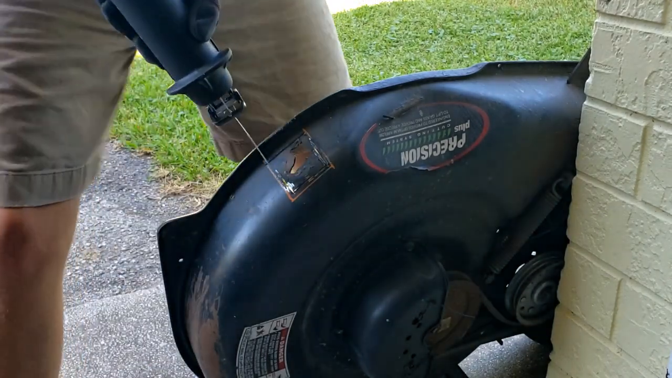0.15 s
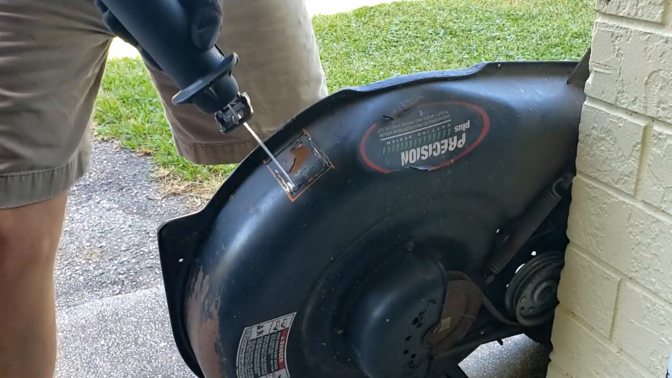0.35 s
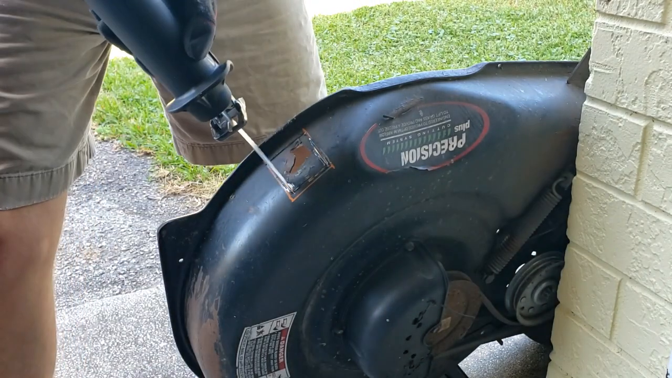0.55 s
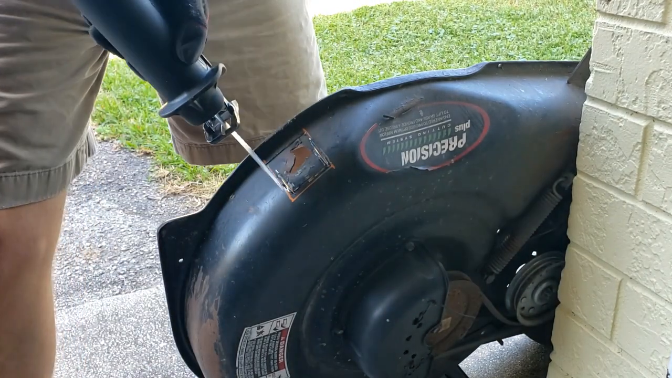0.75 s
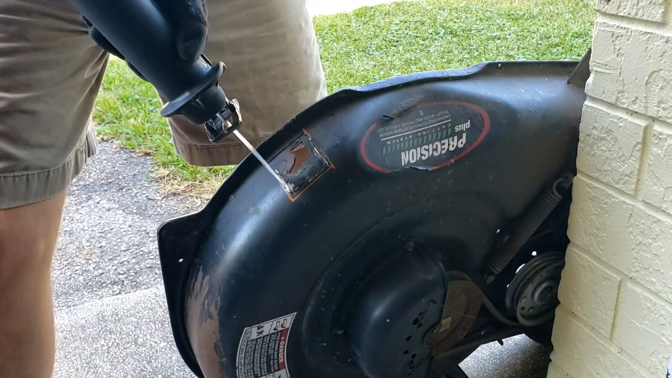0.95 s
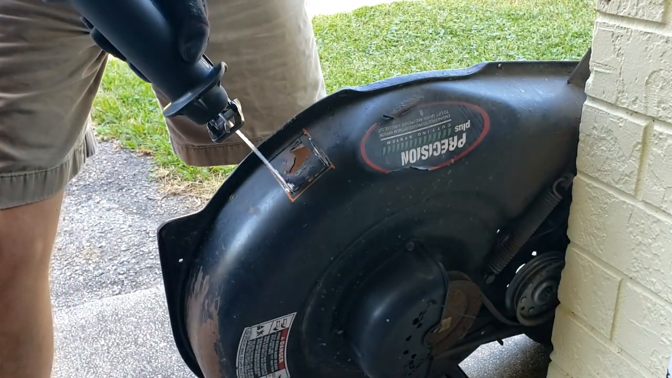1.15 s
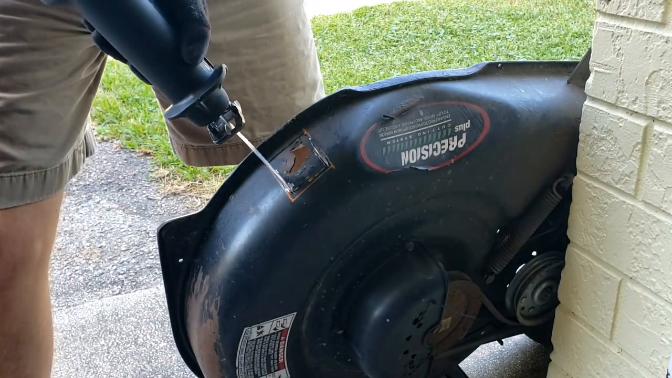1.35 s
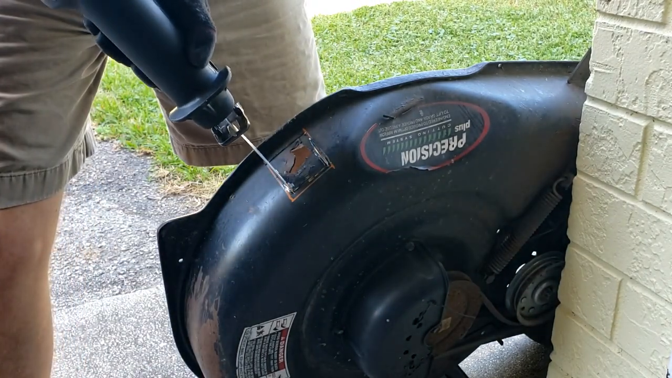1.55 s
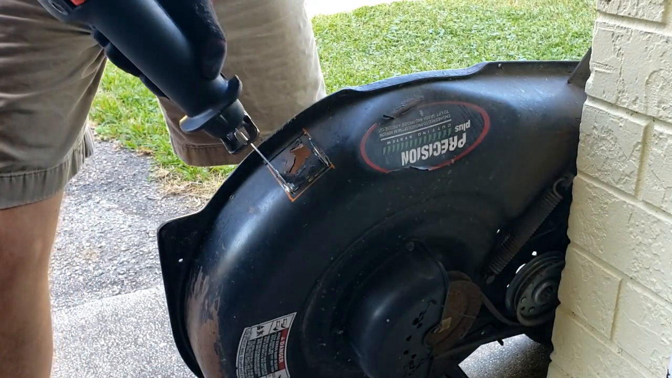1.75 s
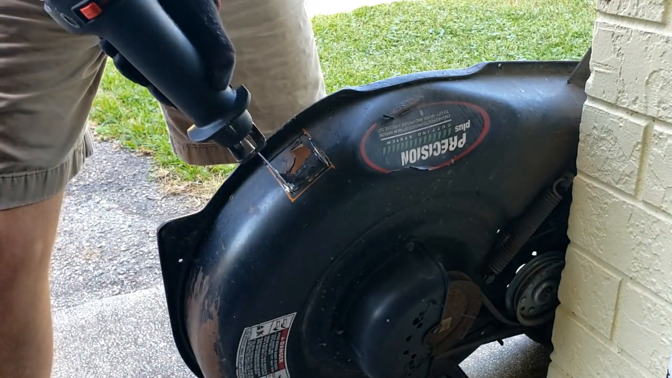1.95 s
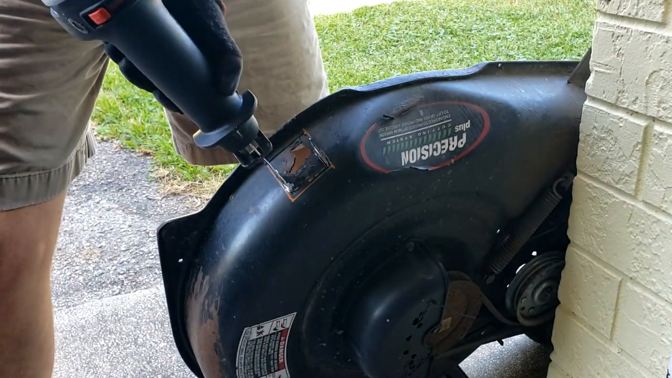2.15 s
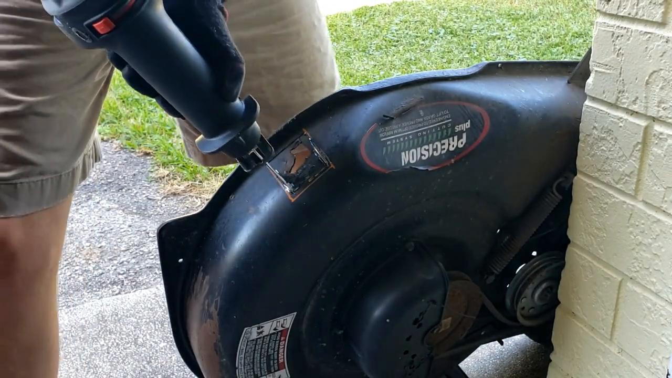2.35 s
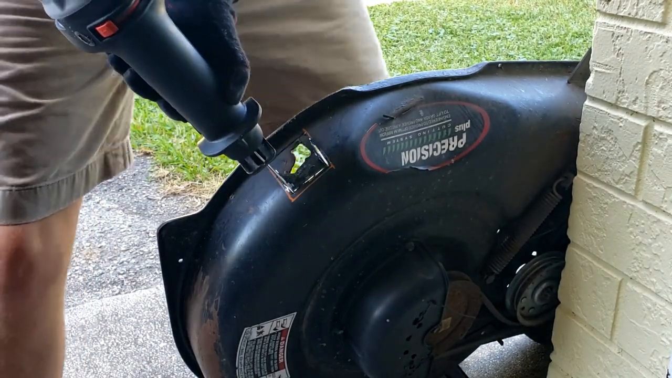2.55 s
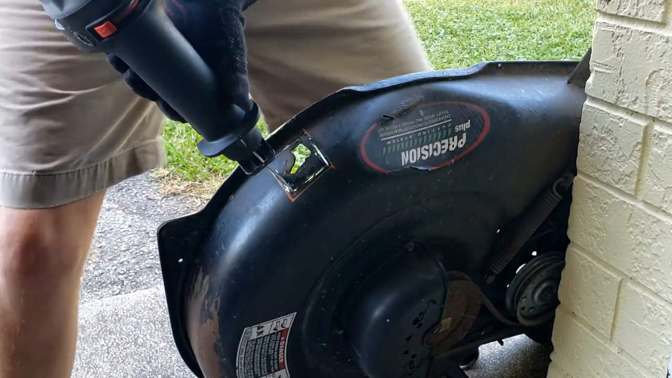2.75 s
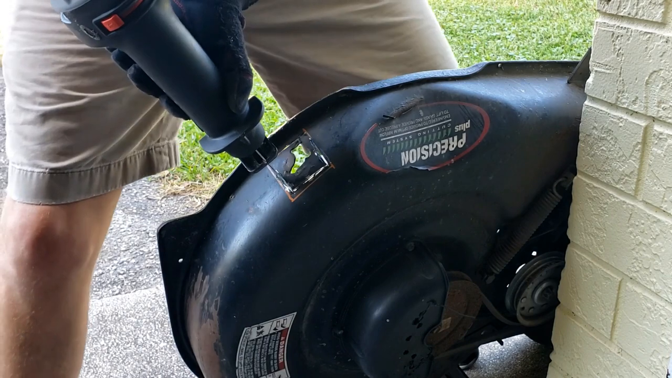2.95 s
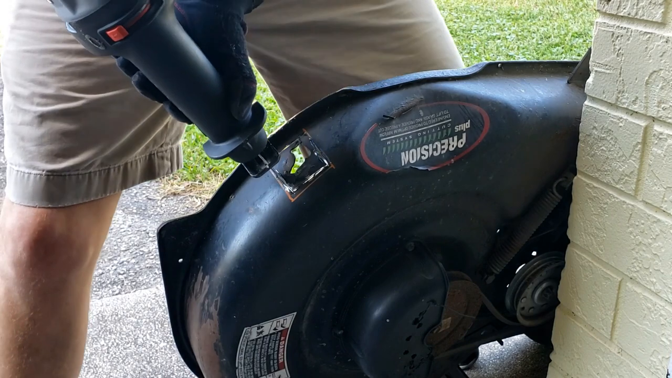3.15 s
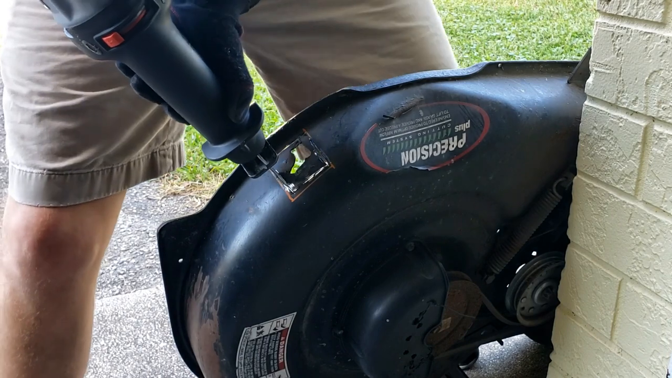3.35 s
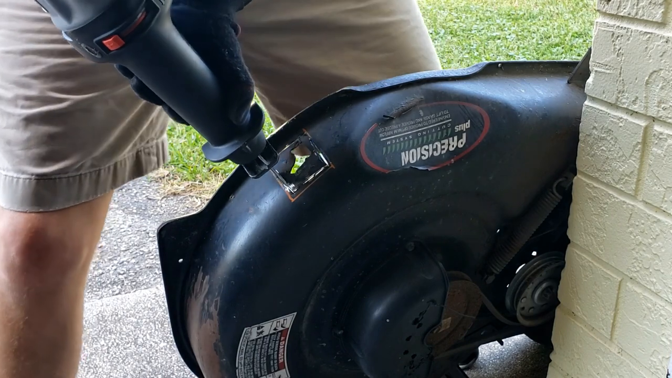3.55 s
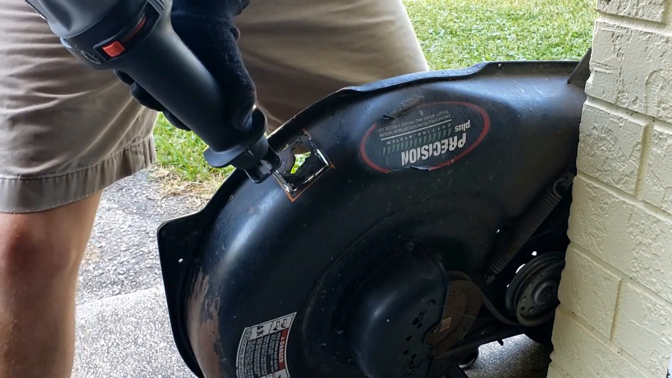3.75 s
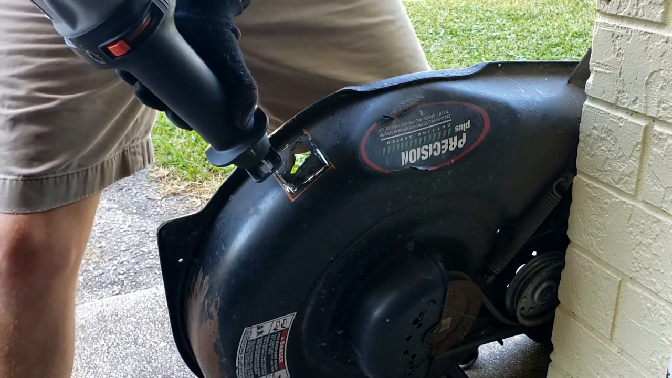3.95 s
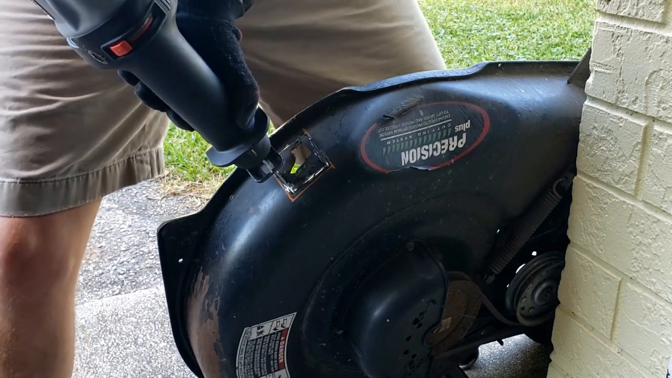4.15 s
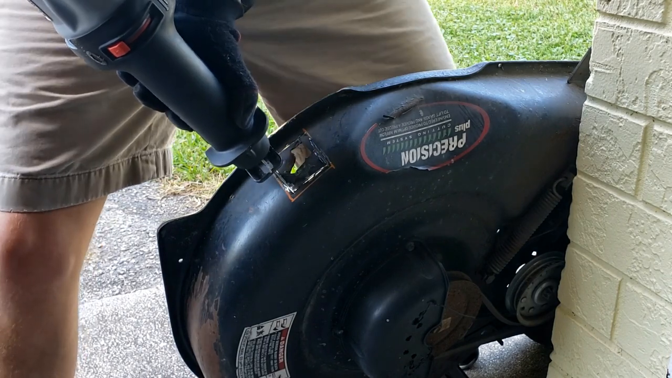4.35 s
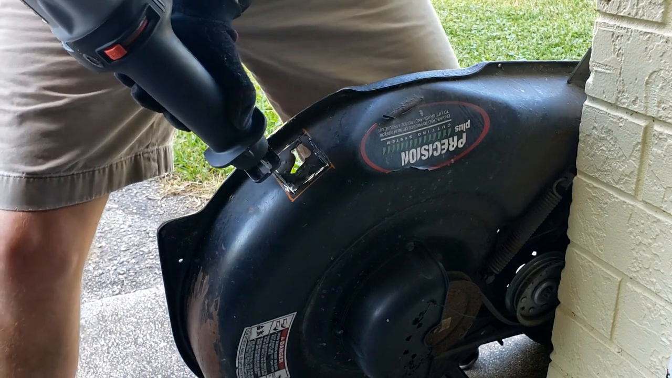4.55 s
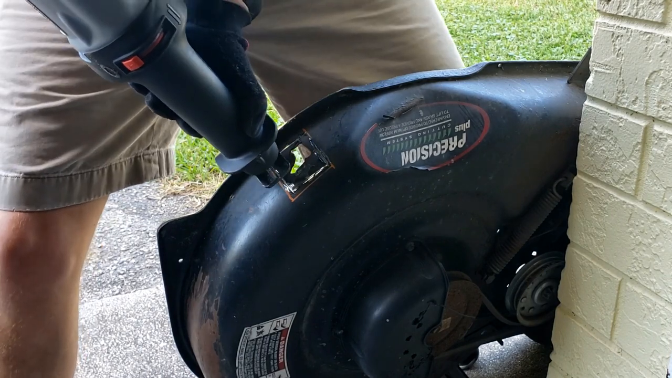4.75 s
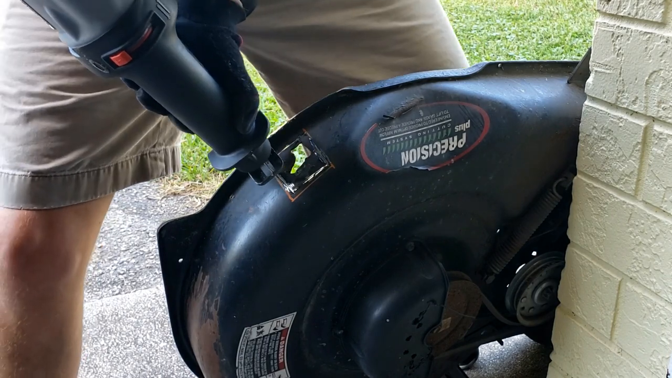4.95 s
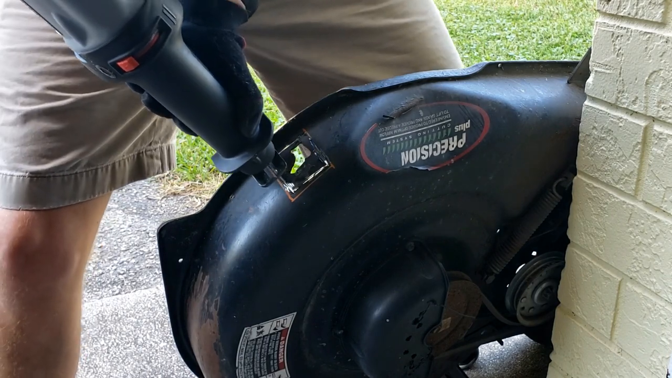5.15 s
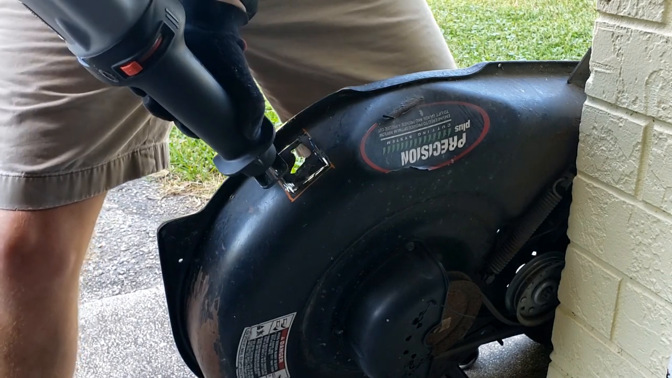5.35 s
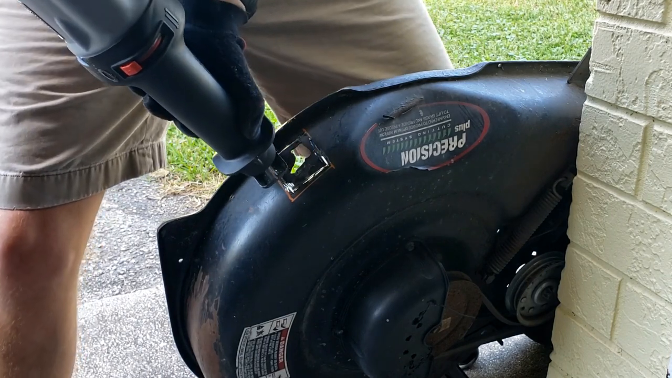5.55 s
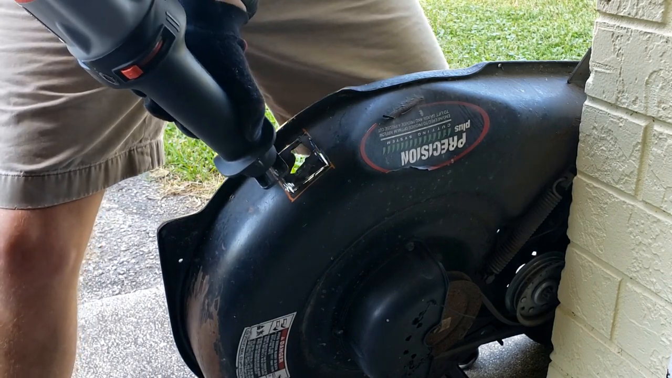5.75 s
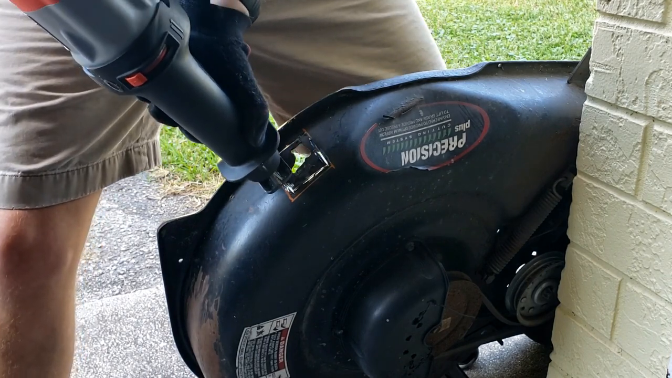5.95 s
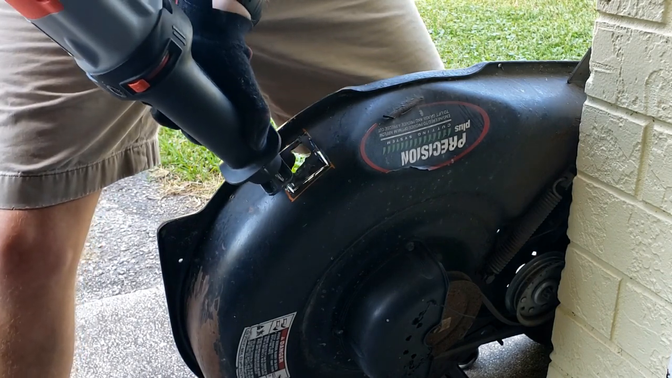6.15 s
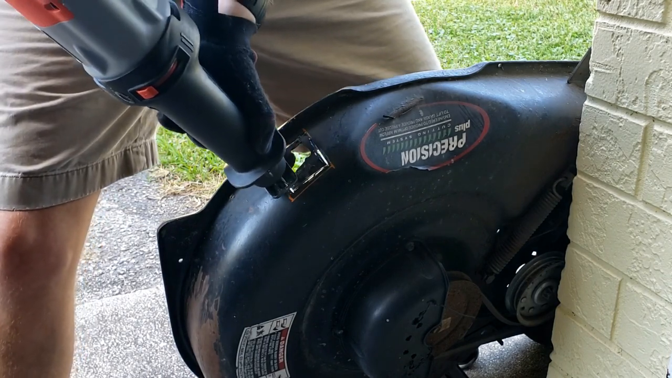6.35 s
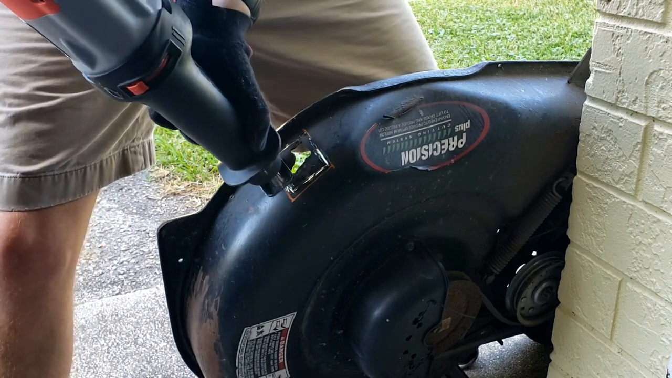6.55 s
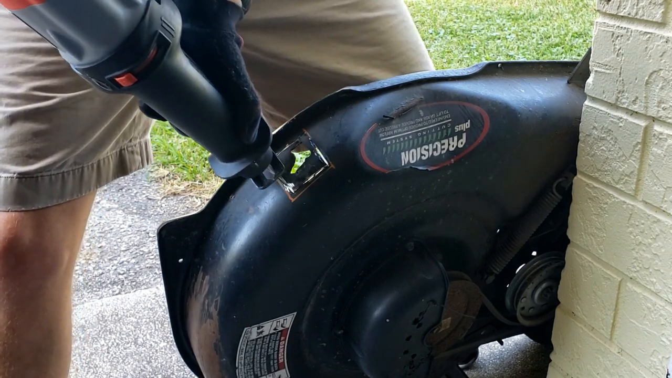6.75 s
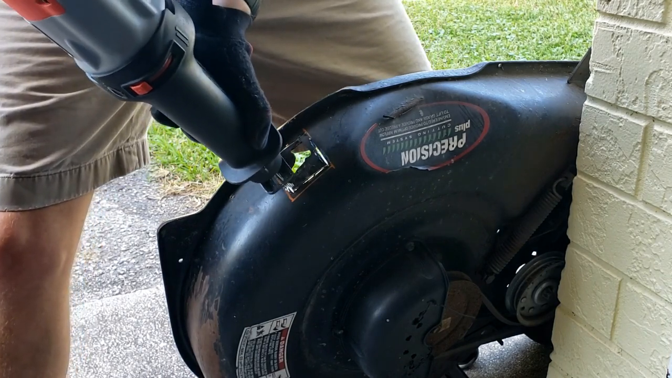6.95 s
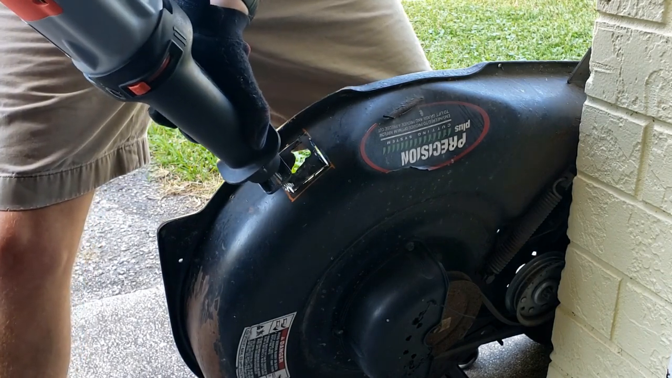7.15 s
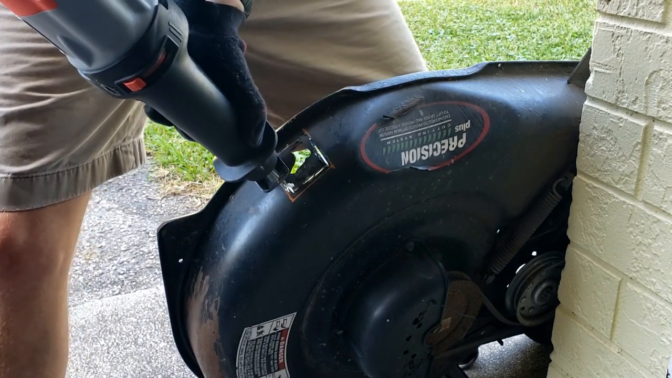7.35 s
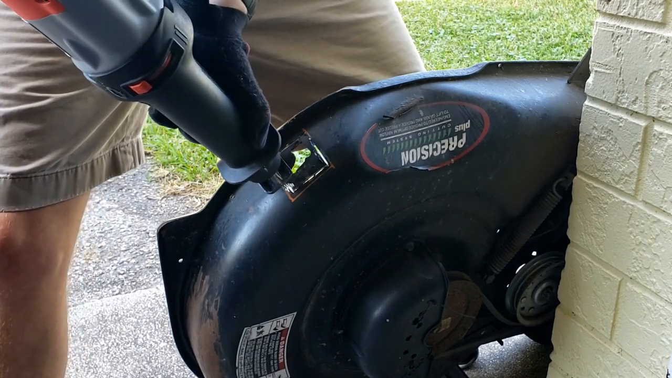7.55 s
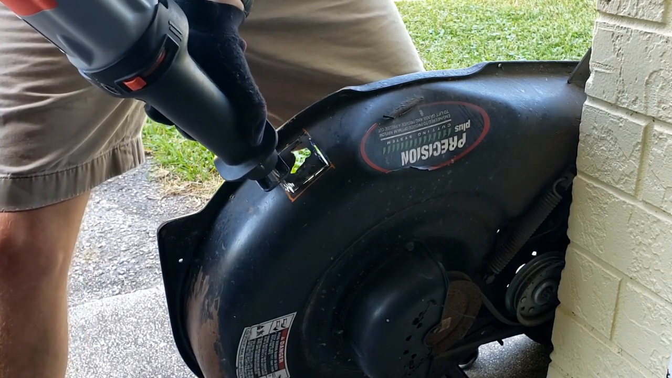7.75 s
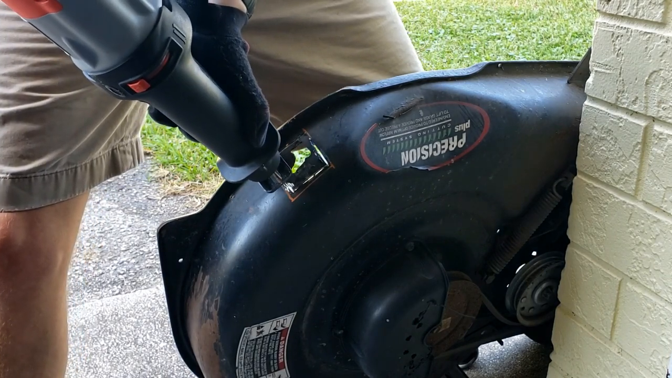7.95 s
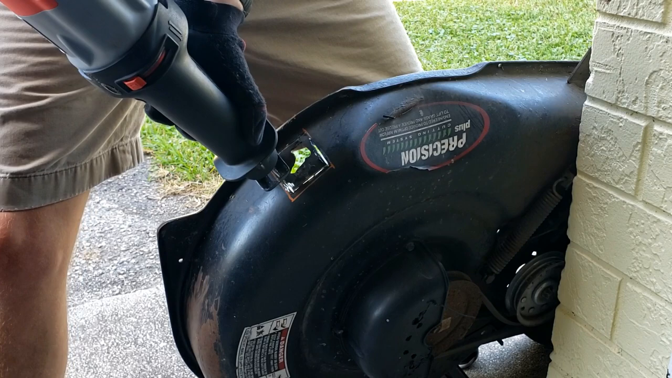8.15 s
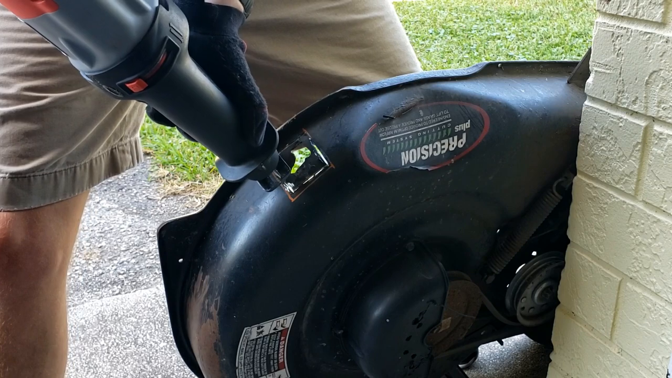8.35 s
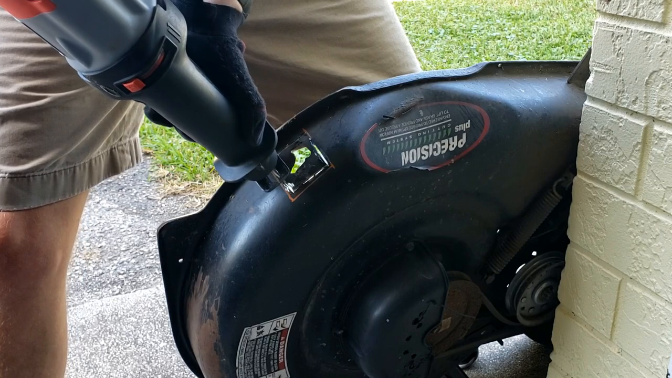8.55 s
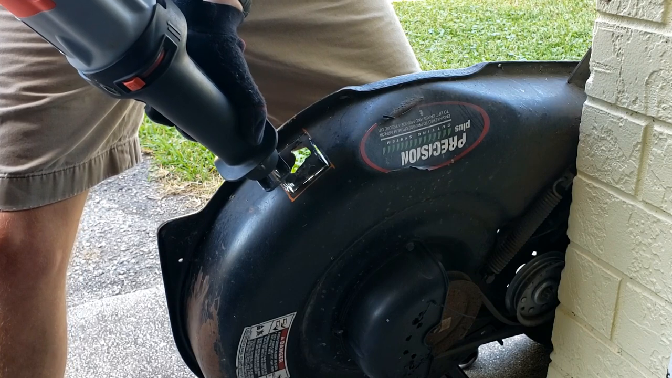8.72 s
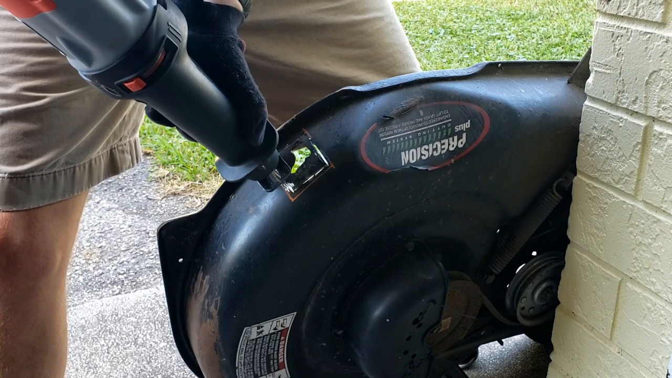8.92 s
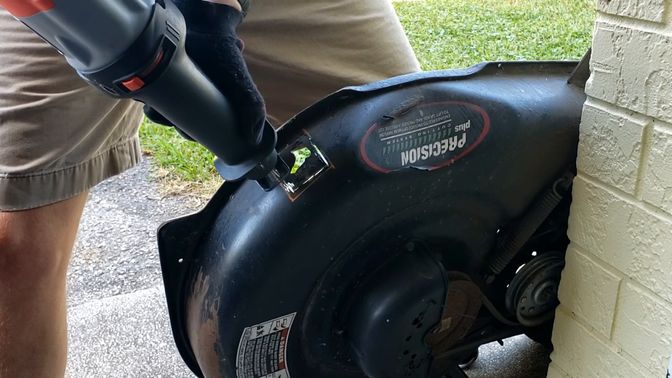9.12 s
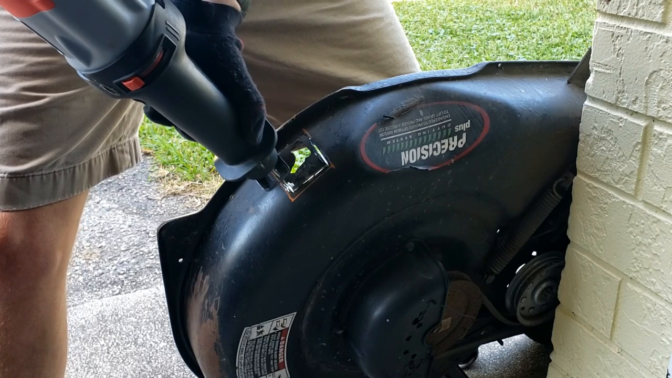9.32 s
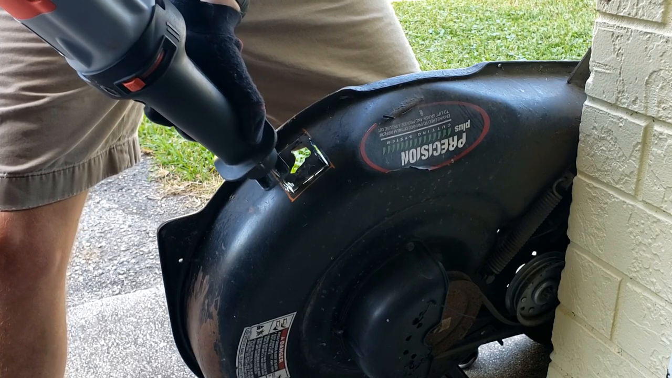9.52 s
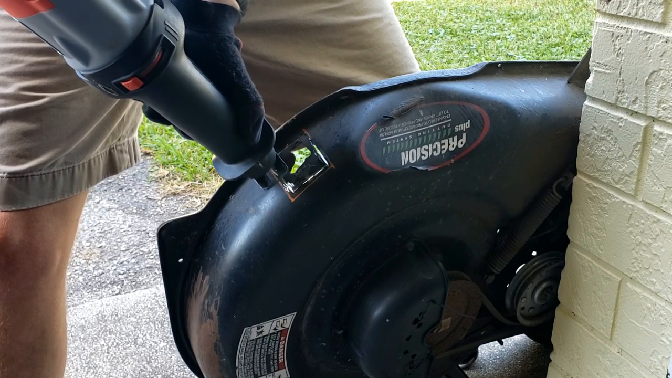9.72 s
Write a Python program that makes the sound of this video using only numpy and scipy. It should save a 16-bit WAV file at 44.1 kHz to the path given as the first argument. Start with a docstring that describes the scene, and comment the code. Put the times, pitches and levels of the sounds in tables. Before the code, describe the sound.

Close by in the open air, a hollow steel deck is nudged and a thin blade scrapes lightly in its opening, with a brief shrill squeak. An electric reciprocating saw then spins up with a rising whine and buzz, jerking the sheet into loud clanging bangs. It breaks off for under a second, restarts, and cuts steadily with fast rattling blows and bright rasp. Faint wind buffets the microphone; no reverberant room.

```python
"""Distant rumble outdoors, two soft bumps of a mower deck set down, then a blade scraping and squeaking
in its slot. The reciprocating saw starts up, rasps, breaks off briefly and bites again; each jerk of the
thin steel sheet rings the deck, ten or more bangs a second. Tooth contacts and blows drive ringing modes
and coloured bands; wandering tones make whine, buzz and panel song; shaped noise makes roar, rumble
and wind on the microphone ports. The steel lies a little to the right."""
import sys
import numpy as np
from scipy import signal
from scipy.fft import rfft, irfft, next_fast_len
from scipy.io import wavfile

SR = 44100
rng = np.random.default_rng(int(sys.argv[2]) if len(sys.argv) > 2 else 0)


def invert_db(x):
    """Field ratio 10**(x/20) for x, a level in decibels (scalar or array-like)."""
    u = np.asarray(x, float) / 20
    return 10 ** u


def inscribe(sig):
    """Save sig as 16-bit PCM at rate SR to the path in sys.argv[1].

    A 1-D sig is mono; a 2-D sig holds one channel per row.
    Samples are clipped to [-1, 1] before scaling.
    """
    pcm = np.round(np.clip(np.atleast_2d(sig).T, -1, 1) * 32767)
    wavfile.write(sys.argv[1], SR, pcm.astype(np.int16))


N = 435708


def rms_one(x):
    """Scale to rms 1."""
    return x / np.sqrt(np.mean(x ** 2) + 1e-20)


def in_time(rows):
    """Columns of a curve table, one value per sample."""
    s, *columns = np.transpose(rows)
    return [np.interp(np.arange(N) / SR, s, c) for c in columns]


def held(rows, rise, fall):
    """Levels in dB of events that rise, hold and fall (slopes in dB per s); the loudest wins."""
    rows = np.array(rows)
    t = np.arange(0, N, 64)[:, None] / SR
    start_s, length_s = rows[:, 0], rows[:, 1]
    before_db = rise * np.maximum(start_s - t, 0)
    after_db = fall * np.maximum(t - start_s - length_s, 0)
    curves = [np.max(db - before_db - after_db, axis=1) for db in rows.T[2:]]
    return [np.interp(np.arange(N) / SR, t[:, 0], curve) for curve in curves]


def swells(times, levels_db, rise_s, fall_s):
    """An envelope that rises smoothly and dies at each time."""
    marks = np.full(N, 1e-18)
    np.add.at(marks, np.round(np.array(times) * SR).astype(int), invert_db(levels_db))
    up, down = np.exp(-1 / (rise_s * SR)), np.exp(-1 / (fall_s * SR))
    return signal.lfilter([(1 - up) ** 2], np.poly([up, up, down]), marks)


def flicker(count):
    """Slow random wavering below about 21 Hz, of spread 1, one row per layer."""
    r = np.exp(-2 * np.pi * 21 / SR)
    white = rng.standard_normal((count, N + SR))
    slow = signal.lfilter([1], [1, -2 * r, r * r], white)[:, SR:]     # drop the filter's first second
    return slow / slow.std(axis=1, keepdims=True)


def at_hz(points, hz):
    """Read a spectrum on a log axis."""
    hz_points, values = np.transpose(points)
    return np.interp(np.log(hz + 1), np.log(hz_points + 1), values)


def colour(x, spectrum):
    """Shape a flat signal by a spectrum; rms 1 for rms 1 white input."""
    size = next_fast_len(N)
    gain = invert_db(at_hz(spectrum, np.arange(size // 2 + 1) * SR / size))
    return irfft(rfft(x, size) * rms_one(gain), size)[..., :N]


def uneven(x, width_hz, depth_db):
    """A random comb of peaks and dips, as from many unnamed modes."""
    size = next_fast_len(N)
    knots = rng.standard_normal(round(SR / width_hz))
    hz = np.arange(size // 2 + 1) * SR / size
    gain = invert_db(depth_db * np.interp(hz, np.arange(len(knots)) * width_hz, knots))
    return irfft(rfft(x, size) * gain, size)[..., :N]


def band(x, low_hz, high_hz):
    """Band-pass."""
    return signal.sosfilt(signal.butter(2, [low_hz, high_hz], "band", fs=SR, output="sos"), x)


def ring(force, hz, t60):
    """One damped mode, dying 60 dB in t60 seconds; a white force of rms 1 gives rms 1."""
    r, w = invert_db(-60 / (max(t60, .004) * SR)), 2 * np.pi * hz / SR
    return signal.lfilter([0, 2 * np.sqrt(1 - r) * np.sin(w)], [1, -2 * r * np.cos(w), r * r], force + 1e-18)


def wavering(hz, width_hz, steady):
    """A tone on a moving pitch, partly steady, partly narrow noise; rms 1."""
    white = rng.standard_normal((2, N))
    wobble = signal.lfilter([1], [1, -np.exp(-np.pi * width_hz / SR)], white)
    height = steady + rms_one(wobble[0]) + 1j * rms_one(wobble[1])
    return rms_one(np.real(height * np.exp(2j * np.pi * np.cumsum(hz) / SR)))


def teeth(per_s, spread_db):
    """Dense tooth contacts of uneven size, two unrelated trains; rms 1."""
    sizes = invert_db(spread_db * np.minimum(rng.exponential(1, (2, N)), 5))
    signed = sizes * rng.choice([-1, 1], (2, N))
    return rms_one(signed * (rng.random((2, N)) < per_s / SR))


def two_ears(pair, hz):
    """Mix two unrelated signals so that left and right are as alike as the table says at hz."""
    # how alike the two microphone channels are: pitch_hz, likeness (0 unrelated to 1 identical)
    likeness = [(40, 0.93), (125, 1), (550, 0.86), (1100, 0.97), (2000, 0.99), (4000, 0.097), (8000, 0.062),
                (15000, 0.22)]
    alike = np.clip(at_hz(likeness, hz), 0, 1)
    return np.sqrt((1 + alike) / 2) * pair[0] + np.sqrt((1 - alike) / 2) * pair[1] * [[1], [-1]]


def outdoors():
    """Far rumble with a faint hiss, and wind on the ports: deep lumps and a higher flutter, as shaped noise."""
    # colour of the distance: pitch_hz, relative level_db (per Hz)
    rumble_colour = [(12, -62), (20, -28), (40, -31.5), (64, -4), (202, -28.5), (220, -30), (633, -41.5),
                     (707, -45), (1020, -49), (6950, -64.5), (15600, -53)]
    # rise and fall of the distance: time_s, relative level_db
    rumble_level = [(0, -52), (4.6, -53.5), (5.0, -46.5), (5.9, -47.5), (6.1, -57), (6.5, -52.5),
                    (7.0, -46), (8.0, -49), (9.1, -43), (9.88, -46)]
    # puffs of wind on the microphone ports: start_s, relative deep_db, relative upper_db
    gusts = [(0.05, -62, -60), (1.2, -41, -56), (2.3, -63, -58), (3.4, -56, -57), (4.7, -58, -41),
             (4.9, -57, -35.5), (5.1, -60, -34), (6.049, -70, -46), (6.821, -47, -51), (6.969, -42, -50),
             (7.052, -53, -59), (7.402, -38, -55), (7.601, -61, -65), (7.82, -59, -44), (8.24, -46, -38),
             (9.12, -35, -58), (9.379, -50, -54), (9.8, -48, -47.5)]
    rise_s, fall_s, calm_db = 0.014, 0.067, -71.5
    rumble_db, = in_time(rumble_level)
    s, deep_db, upper_db = np.transpose(gusts)
    far = colour(rng.standard_normal((2, N)), rumble_colour)
    deep = two_ears(band(far, 15, 80), 40)
    middle = two_ears(band(far, 100, 320), 146.6)
    high = two_ears(band(far, 246, 19000), 8000)
    flutter = rms_one(band(two_ears(rng.standard_normal((2, N)), 150), 78, 324))
    lumps = rms_one(band(rng.standard_normal((2, N)), 22, 75))
    deep_wind = swells(s, deep_db, rise_s, fall_s) * lumps
    upper_wind = (invert_db(calm_db) + swells(s, upper_db, rise_s, fall_s)) * flutter
    return invert_db(rumble_db) * (deep + middle + high) + deep_wind + upper_wind


def shifts():
    """The deck set down and shifted on the ground: two bumps, then coarse grains, each in its dull colour."""
    # the deck shifts on the ground: start_s, length_s, relative level_db
    drags = [(1.11, 0.21, -44), (1.46, 0.036, -65)]
    # colour of the ground under the deck: pitch_hz, relative level_db (per Hz)
    ground_colour = [(59, -34), (100, -0.5), (257, -4.5), (343, -11), (394, -24), (670, -26.5),
                     (1140, -30.5), (6000, -59), (7800, -89), (13200, -120)]
    # the deck set down: start_s, relative level_db
    bumps = [(0.053, -40.5), (0.108, -44.5)]
    # colour of those bumps: pitch_hz, relative level_db (per Hz)
    bump_colour = [(59, -35), (100, -2), (240, 1.5), (518, -16.5), (1050, -21), (1470, -32), (2260, -24),
                   (4480, -41), (6000, -40), (7800, -69), (13200, -120)]
    level_db, = held(drags, rise=700, fall=298)
    grains = two_ears(teeth(2500, 3.1), 220)
    dragging = invert_db(level_db) * colour(grains, ground_colour)
    set_down = swells(*np.transpose(bumps), 0.0013, 0.017) * colour(grains, bump_colour)
    return dragging + set_down


def squeaks():
    """Stick-slip of the thin blade in the slot: narrow, rough, dying tones made from ringing noise."""
    # squeaks: start_s, pitch_hz, relative level_db, fall_s (fall of the envelope by 60 dB)
    squeak_rows = [(1.862, 11250, -37, 0.14), (1.886, 9970, -37, 0.12), (1.91, 9500, -38, 0.1),
                   (1.937, 9600, -46, 0.2), (1.778, 5530, -58, .15), (3.617, 7530, -48, 0.12),
                   (3.619, 5530, -54, 0.15)]
    white = rng.standard_normal((2, N))
    total = 0
    for s, hz, db, fall_60_s in squeak_rows:
        envelope = swells([s], [db], 0.00067, fall_60_s / np.log(1000))
        total = total + envelope * ring(white, hz, 0.036)
    return total


def motor():
    """A rough gear whine follows the speed over the housing's roar; the windings buzz, most at the start."""
    # motor: time_s, whine_hz (gears), then relative whine_db, buzz_db (mains), roar_db (housing)
    motor_course = [(4.44, 450, -92, -101, -92), (4.465, 500, -66, -56, -64),
                    (4.56, 750, -74, -47.5, -49.5), (4.62, 1150, -39.5, -50, -50),
                    (4.72, 1300, -35, -50, -45), (4.85, 1330, -69, -63, -46), (6.5, 1340, -64, -69, -46),
                    (6.82, 1300, -47, -76, -56), (6.87, 1000, -54, -79, -52), (6.93, 700, -53, -77, -63),
                    (7.05, 550, -72, -59, -50), (7.15, 780, -74, -65, -51.5), (7.27, 1103, -43, -58, -54),
                    (7.36, 1127, -52, -61, -54), (7.44, 1300, -50, -67, -46), (9.88, 1350, -43, -72, -49)]
    # partials of the buzz: multiple of twice the mains (no unit), relative level_db
    buzz_partials = [(2, -3), (4, -1), (5, -2.5)]
    # colour of the housing roar: pitch_hz, relative level_db (per Hz)
    roar_colour = [(88, -36), (150, -14), (508, -3.5), (640, -3), (758, -5), (1500, -8), (6000, -28),
                   (7800, -66), (13200, -120)]
    twice_mains_hz = 120
    whine_hz, whine_db, buzz_db, roar_db = in_time(motor_course)
    whine = wavering(whine_hz, 40.0, 0.86)
    buzz = sum(invert_db(db) * wavering(np.full(N, k * twice_mains_hz), 26.0, 2.4) for k, db in buzz_partials)
    roar = colour(two_ears(rng.standard_normal((2, N)), 600), roar_colour)
    return invert_db(whine_db) * whine + invert_db(buzz_db) * buzz + invert_db(roar_db) * roar


def blade_levels():
    """Drive of the rubbing blade in dB: the louder of sawing and idle scraping, wavering with the grip."""
    # running blade: time_s, relative rasp_db, hiss_db (treble), low_db (low panel mode), tick_db (light ticks)
    sawing = [(4.44, -105, -110, -105, -105), (4.47, -71, -66, -75, -62), (4.67, -50, -58.5, -50, -52),
              (4.84, -29, -44, -33.5, -46), (5.0, -28, -38, -32.5, -28.5), (5.2, -22.5, -34, -30, -33),
              (5.6, -24.5, -33.5, -49, -40), (5.86, -24.5, -37, -33.5, -23.5),
              (6.05, -45, -47, -49.5, -19.5), (6.24, -30.5, -44.5, -30, -25),
              (6.36, -23.5, -38, -33, -23.5), (6.57, -38, -47.5, -38, -31), (6.68, -57, -60, -46, -43),
              (6.74, -28.5, -43.5, -31, -56), (6.84, -69, -63, -34.5, -70), (6.9, -67, -81, -62, -66),
              (7.09, -56, -81, -72, -70), (7.2, -57, -63, -72, -53), (7.36, -45.5, -61, -59, -51),
              (7.42, -28, -40.5, -59, -38), (7.7, -26.5, -34, -38.5, -30), (8.2, -25.5, -31, -33, -10),
              (8.6, -27, -33, -39.5, -23.5), (9.2, -26.5, -29.5, -32, -22), (9.8, -26.5, -39, -44, -5),
              (9.88, -23.5, -31, -36, -18)]
    # idle blade scraping in the slot: start_s, length_s, relative rasp_db, hiss_db (treble),
    # low_db and upper_db (panel modes)
    scrapes = [(0.65, 0.03, -70, -70.5, -63, -67.5), (1.22, 0.03, -47, -59, -54, -57.5),
               (1.3, 0.06, -56, -57, -63, -67), (1.48, 0.019, -56, -65.5, -50, -62),
               (1.66, 0.059, -62, -72, -52, -56), (1.74, .1, -60, -75, -50.5, -55),
               (1.9, 0.064, -58.5, -68, -59, -62.5), (2.19, 0.16, -57.5, -73, -38.5, -68),
               (2.37, 0.042, -61, -68, -42, -67.5), (2.46, 0.12, -64, -78, -72, -76),
               (2.66, 0.0064, -43, -58, -33.5, -68), (3.1, .07, -52, -62, -57, -69),
               (3.18, 0.098, -50.5, -63, -53.5, -62), (3.44, 0.0086, -74, -85, -48.5, -68),
               (3.47, 0.021, -55, -66, -54, -56), (3.62, .02, -66, -70, -68, -70),
               (3.71, 0.027, -54, -66.5, -53, -52), (3.99, 0.088, -49.5, -63.5, -51, -60)]
    *running, tick_db = in_time(sawing)
    idle = held(scrapes, rise=748, fall=230)
    rasp_db, hiss_db, low_db = np.maximum(running, idle[:3])
    deck_db = np.maximum(running[0], idle[0] - 5)     # a light touch wakes the big modes less
    upper_db = np.maximum(running[0] - 6, idle[3])
    # the grip of the teeth wavers, in each layer its own way
    grip_db = 2.5 * flicker(count=5)
    return np.array([rasp_db, hiss_db, low_db, deck_db, upper_db]) + grip_db, tick_db


def all_blows(tick_db):
    """Jerks, and light ticks about every half stroke between them; rows (s, peak, treble, thud, clang)."""
    # knocks and jerks of the sheet: peak_s, relative peak_db, thud_db (over peak),
    # clang_db (1.7 kHz modes, relative)
    jerks = [(1.234, -55, -2, -31), (1.78, -42.5, -13, -32), (2.647, -49, 9, -28), (3.17, -45.5, 0, -13),
             (3.465, -41.5, -14, -30), (3.707, -51, 4, 0), (4.564, -58, 5, -6), (4.669, -31.5, -5, -15),
             (4.821, -21.5, -14, -18), (4.918, -16, -14, -26), (5.012, -16.5, -15, -32),
             (5.062, -11, -10, -26), (5.2, -3, -7.5, -30), (5.323, 0, -22.5, -16), (5.431, 2, -15, -19),
             (5.541, -12, -21, -29), (5.633, 3, -18, -9), (5.84, 0, -20, -8.5), (6.204, -15, -7.5, -35),
             (6.258, -3, -15, -16), (6.365, -1, -16.5, -9), (6.709, -32.5, 8.5, -51), (6.946, -43, 8.5, -2),
             (7.062, -39, 8.5, -15), (7.407, -12.5, -6, -12), (7.524, -5, -26, -10.5),
             (7.698, -8, -18, -29), (7.759, -4, -10.5, -18), (7.822, -3.5, -16.5, -23),
             (7.88, 0.5, -22, -7.5), (7.943, -5.5, -16.5, -20), (7.996, 0, -47, -12.5),
             (8.055, -6.5, -20, -9.5), (8.106, 1.5, -49, -19.5), (8.177, -14.5, -6, -16),
             (8.215, 0, -20, -10), (8.269, -5, -31, -11), (8.321, -1, -30, -13), (8.376, -6.5, -19, -13),
             (8.425, 1, -46, -12.5), (8.534, 0, -52, -15.5), (8.638, -1, -13, -11.5),
             (8.695, -5.5, -19, -23), (8.74, 1.5, -29, -20), (8.843, 0, -44, -9), (8.948, -2, -41, -12),
             (9.052, -2.5, -39, -12.5), (9.163, -4, -15, -12), (9.221, -9, -14, -26),
             (9.261, -0.5, -35, -16.5), (9.367, -5, -43, -6.5), (9.471, -7, -45, -13),
             (9.576, -6, -35, -11), (9.687, -7.5, -38, -8), (9.746, -13, -10.5, -36),
             (9.795, -7.5, -43, -24), (9.86, -14, -7, -12)]
    half_stroke_s, jitter_s, spread_db = .052, 0.0042, 3.5
    s, peak_db, thud_db, clang_db = np.transpose(jerks)
    parts = np.maximum(np.round(np.diff(s) / half_stroke_s), 1).astype(int)
    ticks = np.concatenate([a + (b - a) * np.arange(1, n) / n for a, b, n in zip(s, s[1:], parts)])
    luck = rng.standard_normal((len(ticks), 2))
    ticks = ticks + jitter_s * luck[:, 0]
    tick_peak_db = tick_db[(ticks * SR).astype(int)] + spread_db * luck[:, 1]
    peak_db = np.append(peak_db, tick_peak_db)
    thud_db = np.append(thud_db, np.full(len(ticks), -22))
    clang_db = np.append(clang_db, np.full(len(ticks), -24))
    s = np.append(s, ticks) - 0.0067     # the force builds before the bang peaks
    treble_db = -15 - 0.22 * peak_db     # over peak; soft blows are relatively brighter
    return np.transpose([s, peak_db, treble_db, thud_db, clang_db])


def low_panel(upper_db, low_db, blows):
    """Two modes sung by the rubbing blade; the lower also answers each thud."""
    # panel beside the slot, detuned by the load of the shoe: time_s, low_hz, upper_hz
    panel_modes = [(0, 438, 1180), (2.55, 438, 1174), (2.63, 479, 1234), (2.9, 478, 1200), (3.0, 435, 1170),
                   (3.65, 425, 1162), (3.72, 452, 1270), (3.9, 443, 1213), (4.6, 438.6, 1196),
                   (5.5, 405.2, 1172), (6.5, 391.4, 1090), (7.7, 392.7, 1052), (8.5, 380.1, 1042),
                   (9.88, 364.5, 1040)]
    low_hz, upper_hz = in_time(panel_modes)
    upper = wavering(upper_hz, 30, 1.1)
    low = wavering(low_hz, 5.3, 3.0)
    kicks = swells(blows[:, 0], blows[:, 1] + blows[:, 3] - 17, 0.0067, 0.043)
    return (invert_db(low_db - 5.5) + kicks) * low + invert_db(upper_db) * upper


def sheet(rasp_db, hiss_db, blows):
    """Modes too crowded to tell apart: coloured contacts in four bands, highs dying first."""
    # crowded modes of the sheet: pitch_hz, relative level_db (per Hz)
    sheet_colour = [(100, -26.5), (200, -16.5), (350, -16), (700, -11), (1090, -4.5), (1430, -16),
                    (1800, -11.5), (2600, -10.5), (3700, -17), (5500, -21), (8200, -22.5), (10000, -9.5),
                    (12500, -16.5), (15600, -8)]
    treble_rise_s = 0.0044
    grain = uneven(colour(teeth(12000, 2.55), sheet_colour), 60.0, 3.47)
    s, peak_db, treble_db, thud_db = blows.T[:4]
    thud = invert_db(rasp_db - 16.0) + swells(s, peak_db + thud_db - 4.0, 0.0051, 0.034)
    middle = invert_db(rasp_db - 7.5) + swells(s, peak_db - 13.0, 0.0045, 0.022)
    bright = invert_db(hiss_db) + swells(s, peak_db + treble_db - 3.5, treble_rise_s, 0.02)
    hiss = invert_db(hiss_db - 5.0) + swells(s, peak_db + treble_db - 8.5, treble_rise_s, 0.012)
    return (thud * rms_one(two_ears(band(grain, 106, 615), 260))
            + middle * rms_one(two_ears(band(grain, 830, 2300), 870))
            + bright * rms_one(two_ears(band(grain, 2690, 6130), 6000))
            + hiss * rms_one(two_ears(band(grain, 9440, 12600), 9400)))


def chatter(blows):
    """At each jerk the teeth lock to the strong modes: a short tone near 1087 Hz builds up and breaks off."""
    bursts = swells(blows[:, 0] + 0.0028, blows[:, 1] + 0.68, 0.0029, 0.003)
    return bursts * wavering(np.full(N, 1087), 117.0, 2.12)


def deck_modes(rasp_db, blows):
    """Rasp and the bite of each jerk drive the strong modes, each with its own luck; high modes die first."""
    # modes of the deck: pitch_hz, relative level_db
    deck_table = [(522.2, -50.5), (753.7, -51), (818.3, -50), (969.0, -39.5), (1077, -39.5), (1125, -34),
                  (1254, -48), (1685, -34.5), (1787, -46), (2019, -60), (2256, -46), (2347, -52),
                  (2455, -99), (2724, -50.5), (2977, -42), (3138, -47), (3192, -49.5), (3591, -45),
                  (3747, -49), (3774, -70.5), (3978, -61.5), (4054, -46.5), (4113, -57), (4264, -49),
                  (4511, -54), (5012, -57), (5313, -54), (5507, -51.5), (6315, -76), (6896, -52.5)]
    rise_s, bite_s = 0.0037, 0.0079
    train, out = teeth(7000, 2.74), 0
    luck = rng.standard_normal((len(blows), len(deck_table)))
    for k, (hz, level_db) in enumerate(deck_table):
        clang_db = (blows[:, 4] + 12.0) * (1600 < hz < 1850)
        blow_db = blows[:, 1] + clang_db + 27.5 + 1.95 * luck[:, k]
        bite = invert_db(rasp_db + 23.0) + swells(blows[:, 0], blow_db, rise_s, bite_s)
        shifted = np.roll(train, 7919 * k, axis=1)     # so that the modes do not share their contacts
        force = bite * two_ears(shifted, hz)
        t60 = 0.19 * (1000 / hz) ** 0.78
        out = out + invert_db(level_db) * ring(force, hz, t60)
    return out


def a_little_right(steel):
    """The left channel comes later and slightly softer, so the deck sounds a little to the right."""
    # lag of the left, sound creeping round the microphone body: pitch_hz, lag_samples
    left_lag = [(300, 6.1), (1700, 5.05), (2600, 5.37), (15000, 5.42)]
    size = next_fast_len(N)
    hz = np.arange(size // 2 + 1) * SR / size
    turn = np.exp(-2j * np.pi * hz * at_hz(left_lag, hz) / SR)
    left = irfft(rfft(steel[0], size) * turn, size)[:N]
    return np.array([invert_db(-0.5) * left, steel[1]])


def scene():
    """Blade, blows and motor sound through the steel, over the ground noises and the open air."""
    (rasp_db, hiss_db, low_db, deck_db, upper_db), tick_db = blade_levels()
    blows = all_blows(tick_db)
    steel = deck_modes(deck_db, blows) + chatter(blows)
    steel = steel + sheet(rasp_db, hiss_db, blows) + low_panel(upper_db, low_db, blows)
    steel = band(steel + squeaks() + motor(), 233.0, 20000)
    steel = band(steel, 121, 20500)     # a second low cut: the steel sounds carry no deep bass
    return a_little_right(steel) + outdoors() + shifts()


def top_cut(x):
    """Nothing passes above the cut-off."""
    return signal.sosfilt(signal.butter(12, 15730, fs=SR, output="sos"), x)


def record(dry):
    """The loudest peaks are rounded off smoothly."""
    rounded = 1.24 * np.tanh(dry / 1.378)
    return top_cut(rounded)


dry = scene()
out = record(dry)
inscribe(out)
```